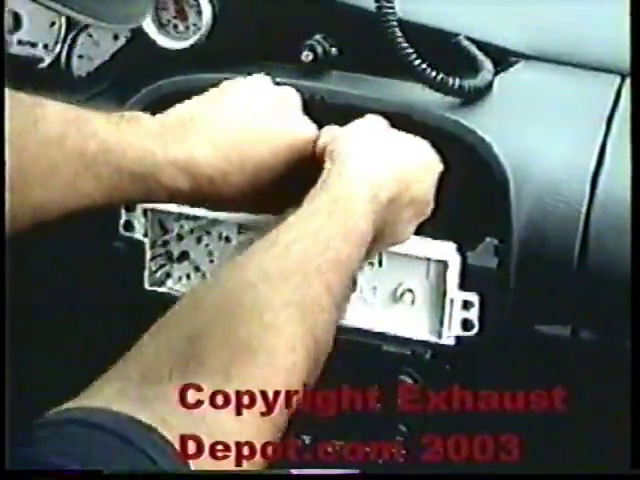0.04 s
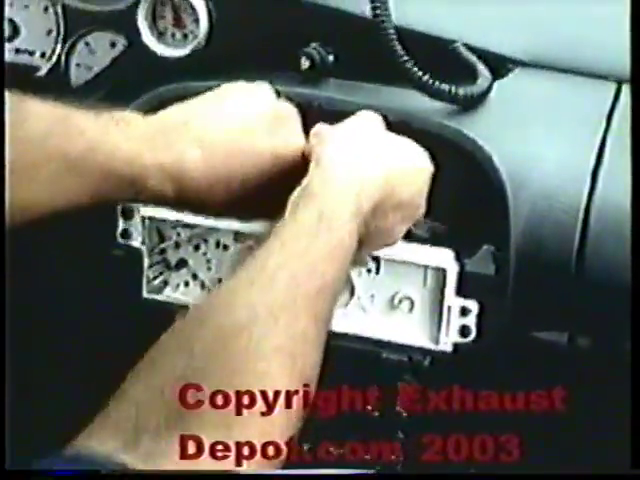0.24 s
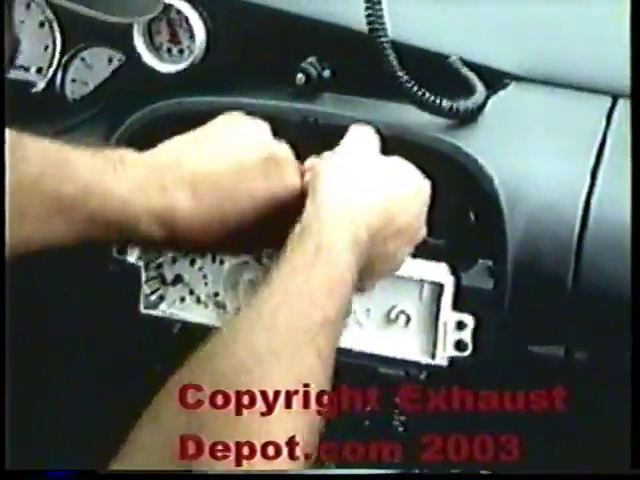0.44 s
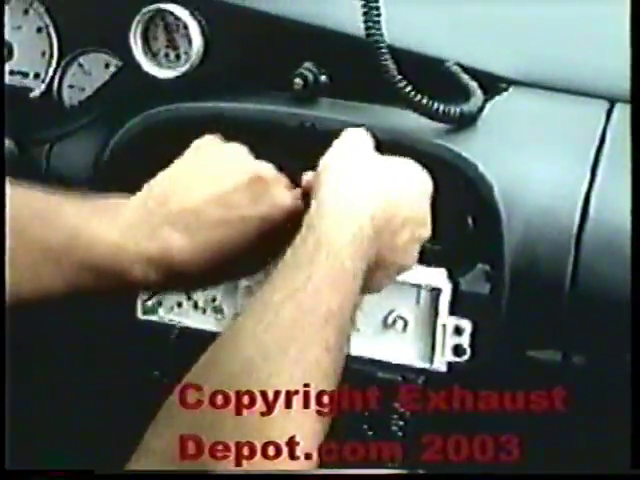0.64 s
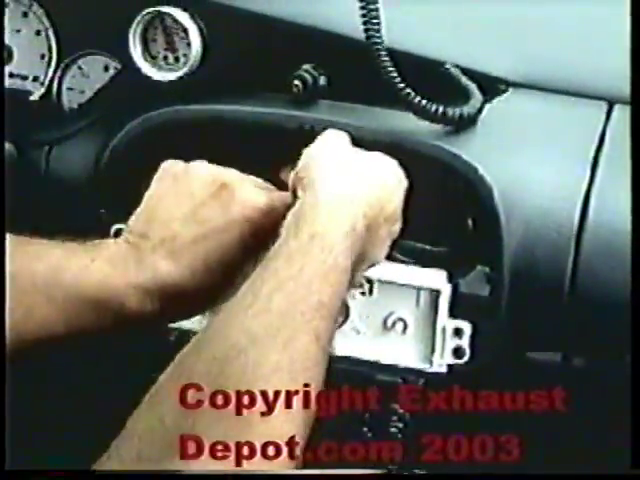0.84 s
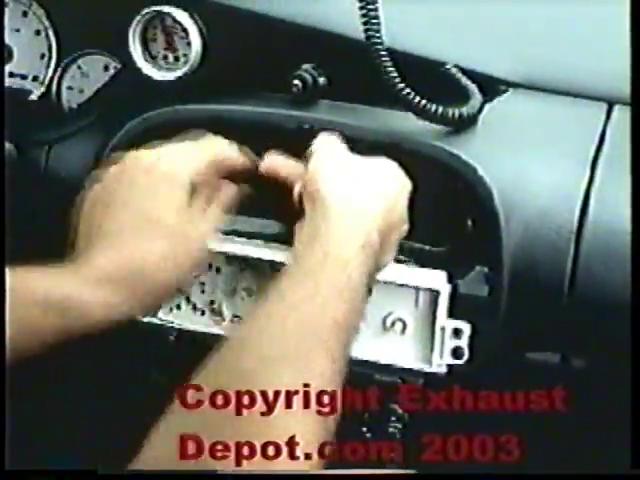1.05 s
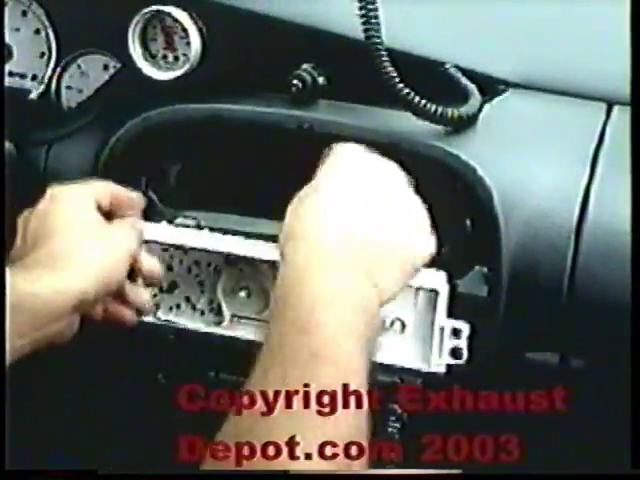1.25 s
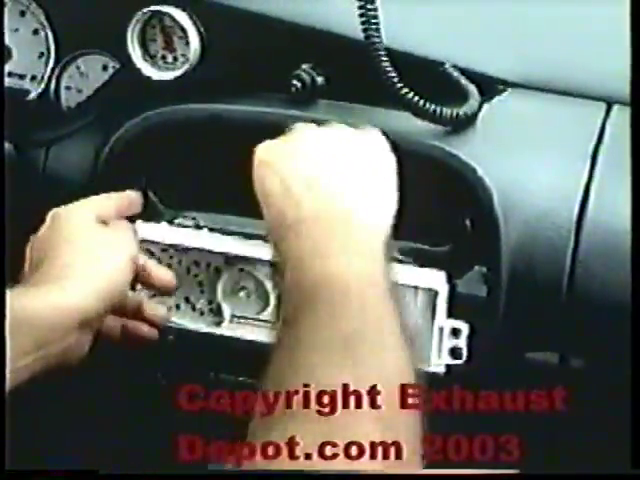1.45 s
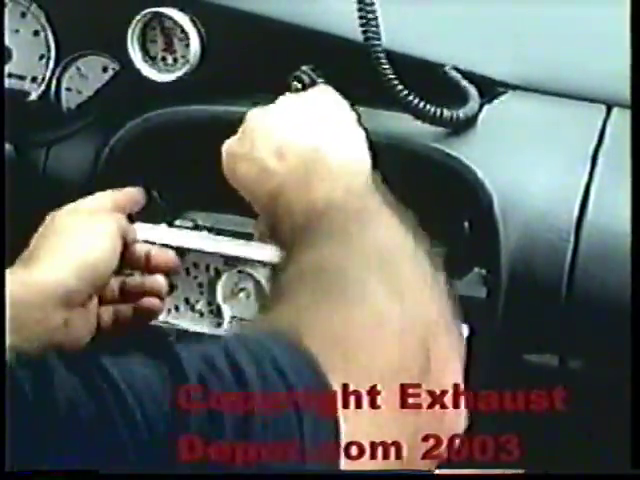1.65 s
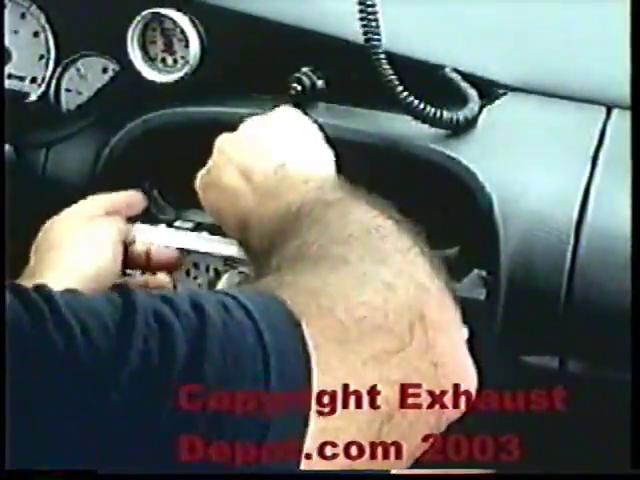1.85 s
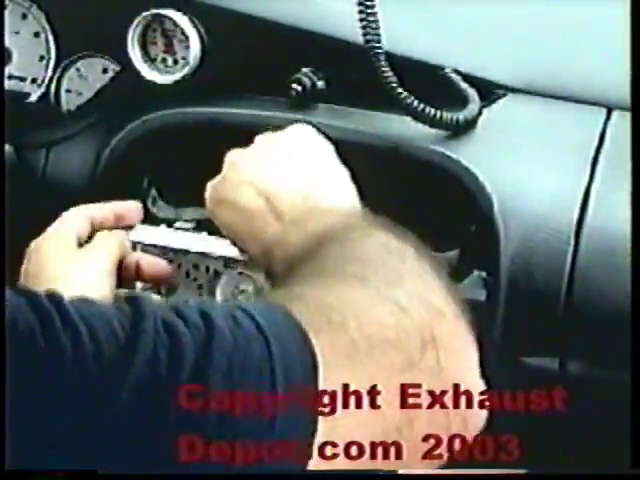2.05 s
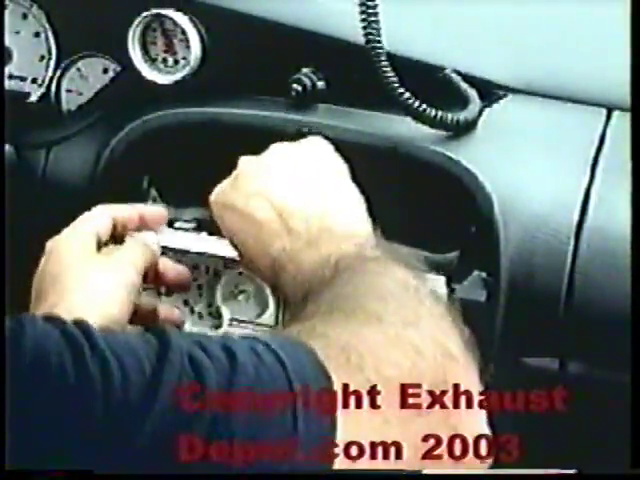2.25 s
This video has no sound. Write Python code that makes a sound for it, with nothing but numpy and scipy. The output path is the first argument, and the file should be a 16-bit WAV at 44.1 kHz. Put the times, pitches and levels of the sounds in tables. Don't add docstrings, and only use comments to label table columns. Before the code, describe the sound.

Close, right channel only: a plastic dash panel pops free with a harsh overloaded crack and hollow rattle, then quiet clicks, creaks and bumps, a later medium clatter, in a small dull car cabin with steady rumble.

```python
import sys
import numpy as np
from scipy import signal
from scipy.io import wavfile
from scipy.ndimage import uniform_filter1d

SR = 44100
rng = np.random.default_rng(int(sys.argv[2]) if len(sys.argv) > 2 else 0)


def put_to_file(sound):
    columns = np.atleast_2d(sound).T
    safe = np.clip(columns, -1, 1)
    whole_steps = np.round(safe * 32767)
    wavfile.write(sys.argv[1], SR, whole_steps.astype(np.int16))


def to_linear_factor(level_db):
    exponent = np.asarray(level_db, float) / 20
    return 10 ** exponent


N = 101429

# frequency in Hz, level in dB per Hz.
FLOOR_SPECTRUM = [(18, -32), (30, 5), (130, 1), (182, -10), (263, -10), (874, -15.5), (3780, -37.5),
                  (7080, -38.5), (15500, -46)]
# start in seconds, slip
# length in seconds, then panel, rib and crack levels in dB.
SNAPS = [(.069, 0.02, -19.5, -25.5, -41.5), (.1186, 0.013, -33, -45, -46), (.1995, 0.016, -30, -30, -10),
         (.215, 0.056, -19, -23.5, -34), (.309, 0.015, -54, -31, -31.5), (.3325, 0.046, -18, -16.5, -8),
         (.349, 0.023, 0, -6, -23), (.3825, 0.029, -1.5, -6.5, -14.5), (.416, 0.02, -19, -23, -27.5),
         (.5135, 0.014, -25, -22.5, -26.5), (.529, 0.0096, -26.5, -56, -32.5), (.629, 0.012, -24, -29, -41),
         (.653, 0.0039, -55, -60, -60), (.805, 0.087, -33, -40, -50), (1.084, 0.036, -27.5, -34, -34),
         (1.4546, 0.023, -32, -43.5, -44.5), (1.7125, 0.011, -35, -42, -33.5),
         (1.842, 0.028, -30.5, -35, -42), (1.888, 0.0055, -11.5, -19.5, -48),
         (1.897, 0.02, -9.5, -17, -22.5), (1.9255, 0.022, -12, -19.5, -28.5), (1.949, 0.013, -32, -45, -30),
         (2.016, 0.017, -28, -40.5, -51), (2.151, 0.028, -24.5, -37, -51)]
# start in seconds, length in seconds,
# then panel, rib and crack levels in dB.
CREAKS = [(.24, 0.028, -26, -29.5, -35.5), (.285, 0.047, -24.5, -36, -41), (.69, 0.041, -68, -70, -63),
          (1.04, 0.061, -43, -39.5, -40), (1.14, 0.026, -26.5, -29, -38), (1.163, 0.022, -28, -28, -33.5),
          (1.595, 0.049, -35.5, -37, -42.5), (1.65, 0.04, -34.5, -46, -52), (.64, 0.049, -44, -60, -64),
          (1.858, 0.041, -24, -24, -26), (1.955, 0.02, -32, -55, -58), (.59, 0.018, -58, -64, -62)]
# frequency in Hz, level in dB, 60 dB decay time in seconds.
PANEL_MODES = [(250, -9, 0.029), (305, -19, 0.039), (370, 2.5, 0.046), (421, -2, 0.057),
               (480, -10.5, 0.019), (550, -14, 0.037), (656, -9.5, 0.042), (670, -12, 0.043),
               (780, -17, 0.014)]
RIB_MODES = [(978, -20, 0.048), (1160, 14.5, 0.013), (1325, 12, 0.013), (1570, -8, 0.033),
             (1800, 1.5, 0.022), (1970, -28, 0.0068), (2600, -6, 0.019)]
TAB_MODES = [(2920, 9.5, 0.001), (3300, -28, 0.0007), (4314, -10, 0.0045), (5450, -7, 0.0035),
             (6090, 3, 0.0024), (7230, -3.5, 0.00095), (8650, -10, 0.0004), (11150, -9.5, 0.00061),
             (13200, -13, 0.00047)]
# start in seconds, pitch in Hz, level in dB, length in cycles.
PINGS = [(0.0716, 400, -18.5, 3.4), (.2005, 1750, -19, 24), (.222, 1090, -24, 16), (0.233, 494, -20, 5.9),
         (0.312, 2650, -20.5, 4.2), (0.336, 1732, -12, 8.9), (.343, 1193, -4.5, 11), (.6295, 420, -14, 6),
         (.63, 647, -16.5, 6.9), (.7, 2340, -45, 44), (1.0883, 393.5, -23, 6.1), (1.149, 1820, -31, 32),
         (1.149, 1167, -33, 42), (1.163, 382, -25, 6.1), (1.171, 715, -29, 14), (1.175, 1800, -24.5, 22),
         (1.455, 3710, -44.5, 46), (1.715, 2600, -42, 22), (1.841, 427, -27.5, 5), (1.87, 1800, -29, 40),
         (1.9255, 1800, -15, 7.2), (1.925, 445, -5.5, 2.2), (0.382, 800, -12, 1.3), (0.514, 577, -20, 4.1),
         (0.516, 188, -21, 3.5), (0.633, 200, -20, 3.6), (2.152, 1490, -35.5, 9.4), (0.541, 99, -21, 1.54),
         (.652, 324, -21, 1.9), (.632, 1184, -25, 13)]
# start in seconds, pitch in Hz, level in dB.
BUMPS = [(.072, 207, -14.5), (.345, 31, -21), (.23, 188, -21), (.266, 175, -24), (1.089, 188, -27),
         (.356, 190, -11), (.361, 367, -3.5), (.316, 290, -25), (.397, 364, -3), (.4, 191, -16),
         (.425, 277, -18.5), (2.27, 225, -33), (.68, 187, -31), (1.896, 185, -11), (1.93, 205, -17),
         (2.025, 200, -25), (2.153, 148, -21.5), (2.18, 185, -27.5)]
# start in seconds, pitch in Hz,
# level in dB, length in cycles.
MORE_PINGS = [(0.2015, 396, -21, 5.7), (.202, 930, -22, 8.5), (0.245, 1160, -29, 11), (.259, 1194, -30, 13),
              (.278, 1150, -38, 8.8), (.258, 190, -19.5, 3), (.312, 1500, -26, 8), (.338, 2470, -13, 24),
              (.349, 1170, -9, 12.4), (.351, 475, 1.5, 2.5), (.358, 762, -11, 9), (0.368, 1117, -11, 5.5),
              (.367, 400, -9, 4), (.353, 385, -4, 6), (.384, 440, -1, 3.5), (.401, 410, -9, 3.5),
              (.343, 2000, -12, 14), (.435, 110, -22, 2), (.387, 1044, -13.5, 10), (.391, 738, -9, 7.9),
              (.399, 708, -13, 6.5), (.404, 1344, -19.5, 7.1), (0.416, 443, -14.5, 6.6),
              (0.421, 1170, -31, 11), (.432, 1340, -28, 6.3), (.517, 700, -24, 7.9), (.527, 485, -21.5, 4.7),
              (0.53, 1170, -33, 7.5), (0.53, 2010, -39, 11), (.536, 330, -28, 2.8), (.645, 650, -27.5, 7.5),
              (0.663, 203, -26, 2.4), (1.882, 2650, -28, 14), (1.903, 320, -13, 3), (1.95, 110, -24, 2),
              (1.04, 200, -31, 4), (1.145, 105, -28, 3), (.175, 200, -31, 5), (1.88, 430, -26, 4.6),
              (1.892, 1050, -15, 4.2), (1.893, 1940, -17, 9.1), (1.899, 340.6, -7, 4.9),
              (1.9251, 980, -13, 4.2), (1.931, 668, -13, 7), (1.938, 457, -15, 6.6), (1.955, 280, -20.5, 3.8),
              (1.7145, 2680, -40, 16), (1.165, 1200, -34, 20), (2.165, 327, -31.5, 3.1),
              (2.159, 190, -29, 3.8)]
# start in seconds, pitch in Hz, level in dB, length in cycles.
EDGE_KNOCKS = [
    (.362, 560, -9, 6),
    (.393, 560, -9, 6),
    (1.889, 420, -13, 3),
    (1.912, 600, -20, 6),
    (1.928, 2000, -22, 14),
    (.631, 290, -20, 3),
    (.221, 900, -26, 10),
    (1.96, 75, -24, 2),
    (.31, 210, -27, 4),
]

FLOOR_DB, SWELL_DB, FLICKER_DB, MIC_LOW_HZ = -32, 1, 1.5, 49.5
WHIRR_HZ, WHIRR_WIDTH_HZ, WHIRR_DB = 7180, 390, -58
SNAP_RISE, CREAK_RISE, FALL = 0.13, 0.8, 2.25
SLIPS_PER_S, SLIP_SCATTER_DB = 16000, 1.6
MODE_SCATTER_DB, DETUNE = 3, 0.013
PANEL_LAG_S, RIB_LAG_S, PANEL_LOW_HZ = 0.001975, 0.001013, 153
BUMP_CYCLES = 3.04
SAG = 0.033
CABIN_T60_S, CABIN_DB, CABIN_HZ = 0.089, -20.5, 3240
CEILING, TOP_HZ = .995, 16000


def level(x, db):
    return x * to_linear_factor(db) / np.sqrt(np.mean(x ** 2) + 1e-18)


def band(x, hz, width_hz):
    return signal.lfilter(*signal.iirpeak(min(hz, .45 * SR), hz / width_hz, fs=SR), x)


def walk(rate):
    hold = int(SR / rate)
    steps = np.repeat(rng.standard_normal(N // hold + 1), hold)
    return 0.47 * uniform_filter1d(uniform_filter1d(steps, hold), hold)[:N]


def noise_band(hz, width_hz):
    return band(band(rng.standard_normal(N), hz, width_hz), hz, width_hz)


def floor():
    bed, swell = 0, walk(1.78)
    table_hz, table_db = np.transpose(FLOOR_SPECTRUM)
    for hz in 30 * 2 ** np.arange(0, 9.2, 1 / 3):
        db = np.interp(np.log(hz), np.log(table_hz), table_db)
        db = db + SWELL_DB * swell + FLICKER_DB * walk(12.05)
        bed = bed + to_linear_factor(db) * noise_band(hz, hz / 3.26)
    whirr = noise_band(WHIRR_HZ, WHIRR_WIDTH_HZ) * to_linear_factor(1.5 * walk(40))
    return level(bed, FLOOR_DB) + level(whirr, WHIRR_DB)


def add(out, t, x):
    i = int(t * SR)
    out[i:i + len(x)] += x[:max(len(out) - i, 0)]


def ring(modes, chance):
    t = np.arange(4096) / SR
    out = np.zeros(len(t))
    for (hz, db, t60), louder, sharper in zip(modes, chance[0], chance[1]):
        decay = np.exp(-np.log(1000) * t / t60)
        tone = np.sin(2 * np.pi * hz * (1 + DETUNE * sharper) * t)
        out += to_linear_factor(db + MODE_SCATTER_DB * louder) * decay * tone
    return out


def releases(rows, rise):
    out, t = np.zeros(N), np.arange(8192) / SR
    parts = (PANEL_MODES, RIB_MODES, TAB_MODES)
    lags = (PANEL_LAG_S, RIB_LAG_S, 0)
    for start, length, *part_db in rows:
        when, side, size = rng.random((3, len(t)))
        chance = np.clip(rng.standard_normal((3, 2, 9)), -2, 2)
        x = t / length
        fade = np.clip((x - rise) / (1 - rise), 0, 30) ** 1.4
        shape = np.clip(x / rise, 0, 1) * np.exp(-fade * FALL)
        strength = to_linear_factor(-SLIP_SCATTER_DB * np.log(size + 0.00033))
        slips = (when < SLIPS_PER_S / SR) * np.sign(side - .5) * strength * shape
        for modes, db, lag, c in zip(parts, part_db, lags, chance):
            y = signal.fftconvolve(slips, ring(modes, c))
            loudest = np.sqrt(uniform_filter1d(y ** 2, 256).max())
            add(out, start + lag, y * to_linear_factor(db) / loudest)
    return out


def pings():
    out, t = np.zeros(N), np.arange(8192) / SR
    bumps = [tuple(row) + (BUMP_CYCLES,) for row in BUMPS]
    for start, hz, db, cycles in PINGS + bumps + MORE_PINGS + EDGE_KNOCKS:
        x = t * hz / cycles
        waver = 0.18 * np.cumsum(rng.standard_normal(len(t))) * np.sqrt(hz / cycles / SR)
        turns = hz * t * (1 - SAG * np.minimum(x, 1)) + waver
        add(out, start, to_linear_factor(db) * 10 * x * np.exp(-3 * x) * np.sin(2 * np.pi * turns))
    return out


def cabin(x):
    t = np.arange(8192) / SR
    tail = signal.lfilter(*signal.butter(1, CABIN_HZ, fs=SR), rng.standard_normal(len(t)))
    tail *= np.exp(-np.log(1000) * t / CABIN_T60_S)
    tail *= np.clip(t / 0.0095, 0, 1)
    return x + to_linear_factor(CABIN_DB) * signal.fftconvolve(x, tail / np.sqrt(np.sum(tail ** 2)))[:N]


def high_pass(x, order, hz):
    return signal.sosfilt(signal.butter(order, hz, "high", fs=SR, output="sos"), x)


def scene():
    back = high_pass(floor(), 6, MIC_LOW_HZ)
    trim = releases(SNAPS, SNAP_RISE) + releases(CREAKS, CREAK_RISE)
    trim = high_pass(trim, 2, PANEL_LOW_HZ) + pings()
    return np.array([np.zeros(N), cabin(trim) + back])


def top_cut(x):
    return signal.sosfilt(signal.butter(12, 16080, fs=SR, output="sos"), x)


def record(dry):
    clipped = np.clip(dry, -CEILING, CEILING)
    mix = signal.sosfilt(signal.ellip(8, .2, 70, TOP_HZ, fs=SR, output="sos"), clipped)
    return top_cut(mix)


dry = scene()
out = record(dry)
put_to_file(out)
```